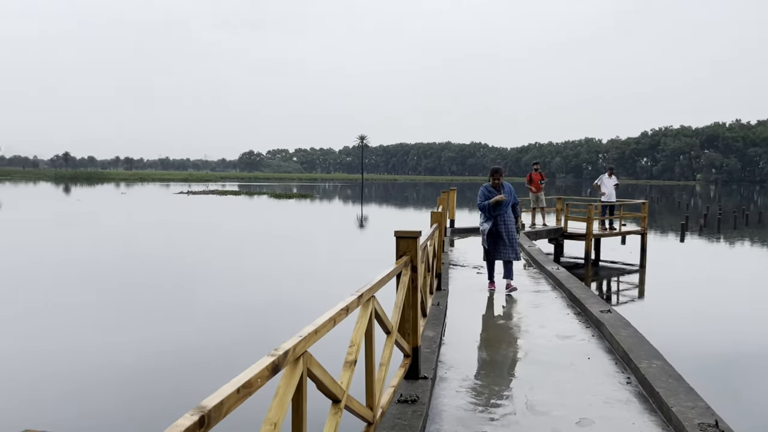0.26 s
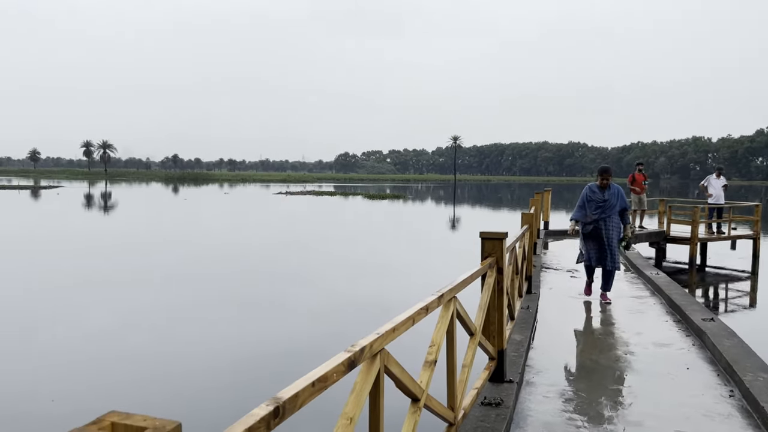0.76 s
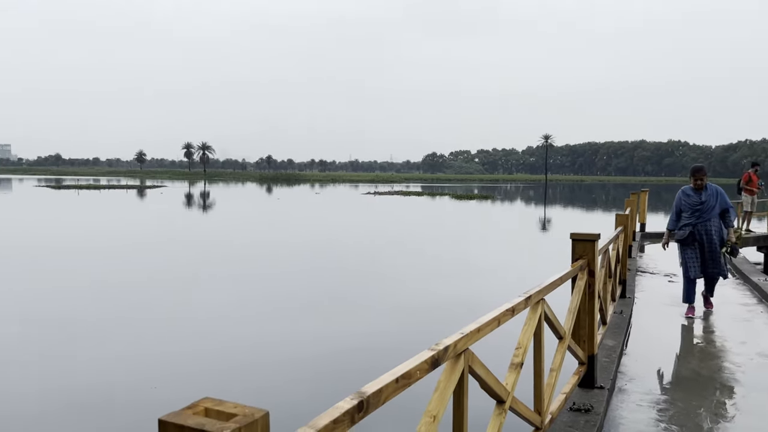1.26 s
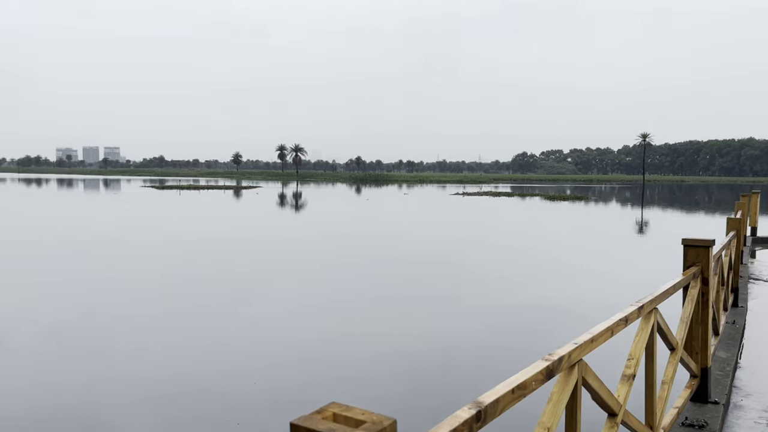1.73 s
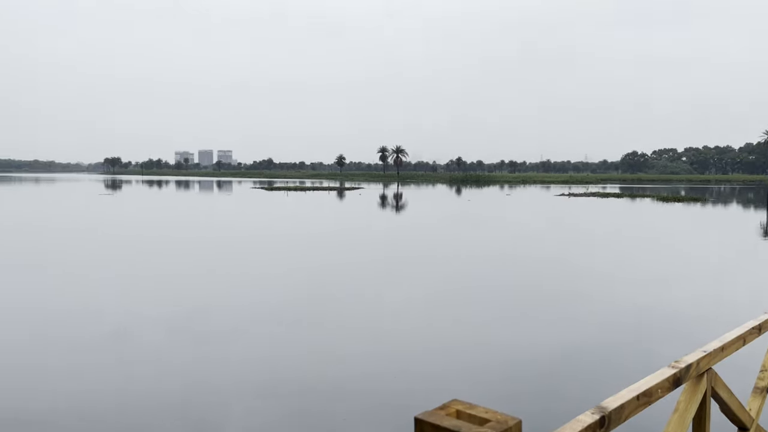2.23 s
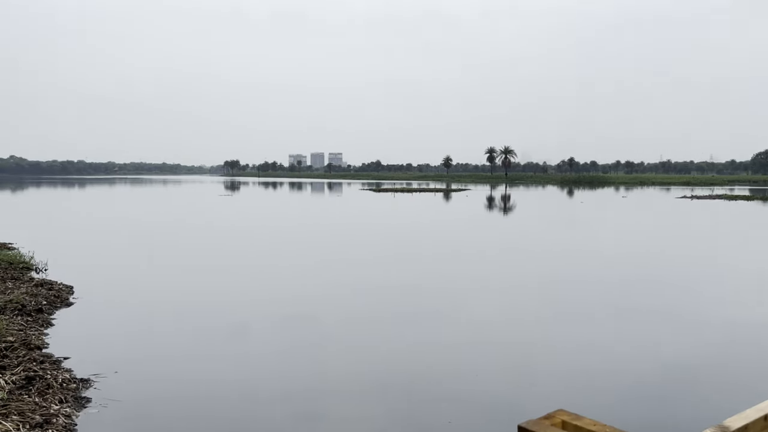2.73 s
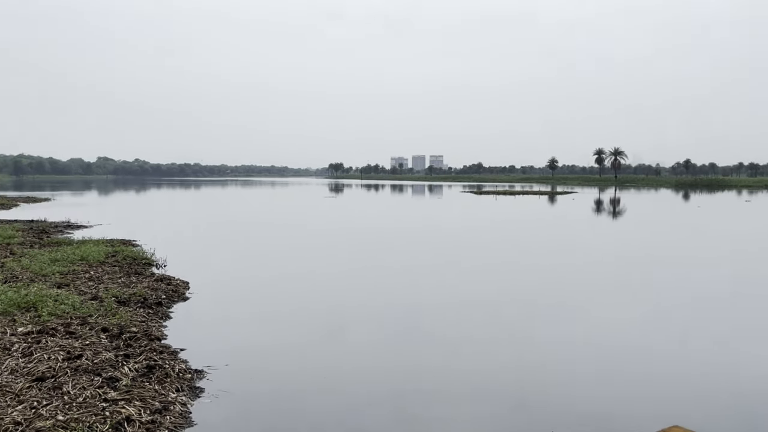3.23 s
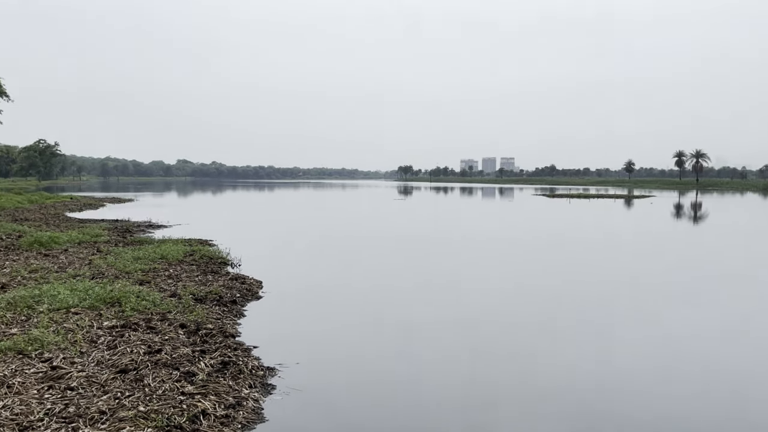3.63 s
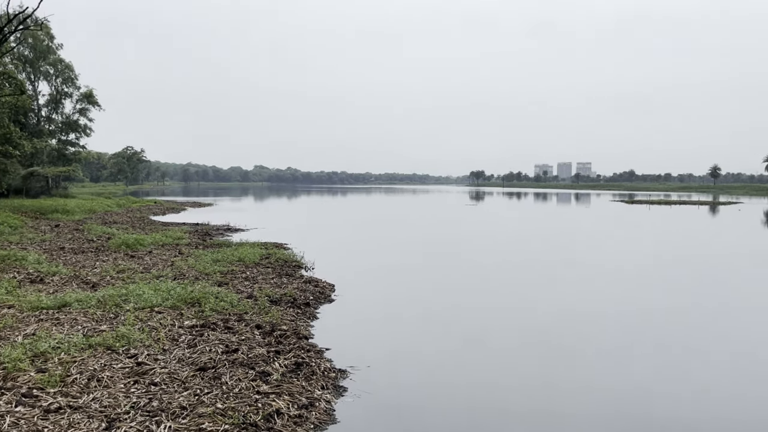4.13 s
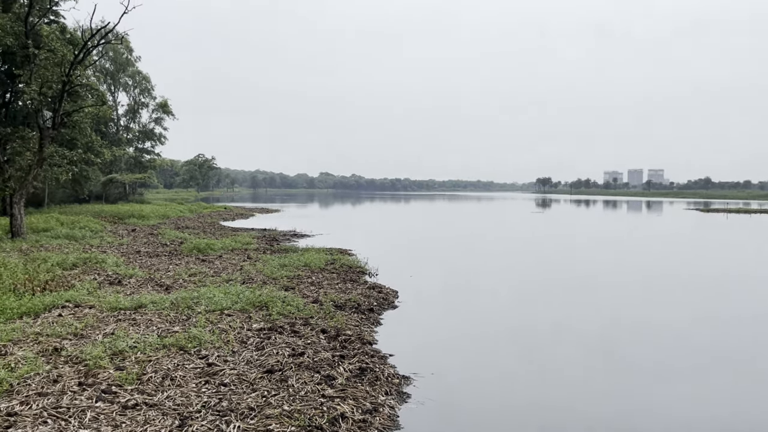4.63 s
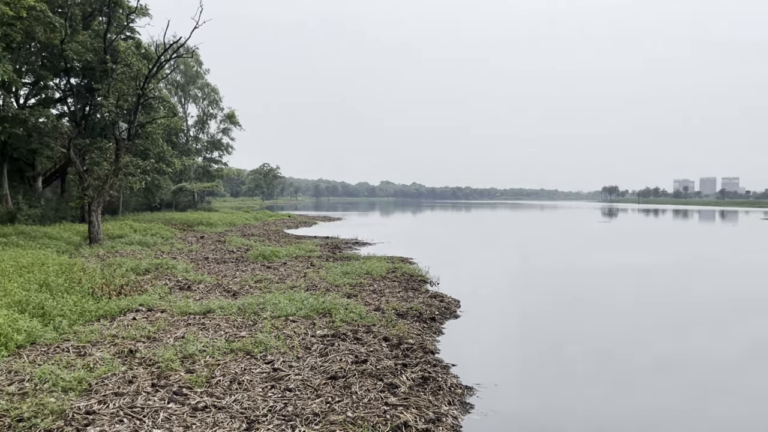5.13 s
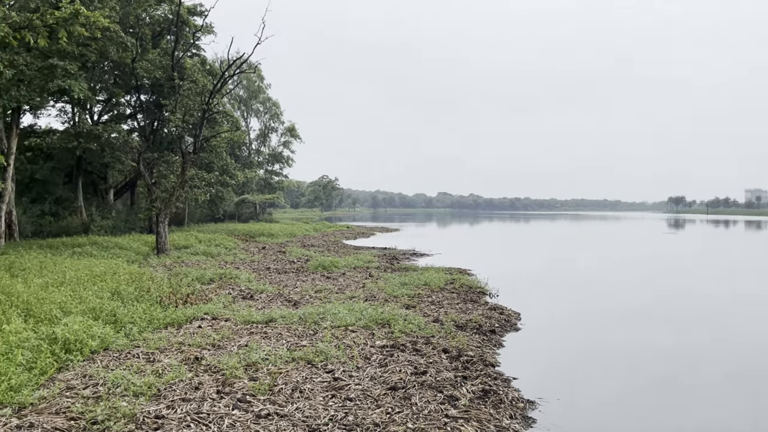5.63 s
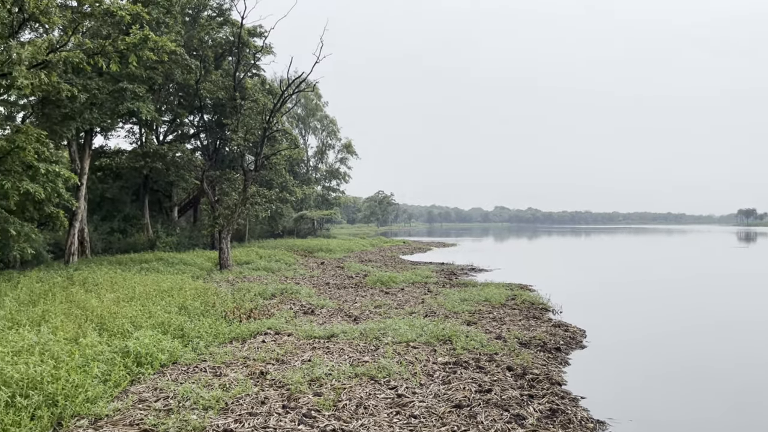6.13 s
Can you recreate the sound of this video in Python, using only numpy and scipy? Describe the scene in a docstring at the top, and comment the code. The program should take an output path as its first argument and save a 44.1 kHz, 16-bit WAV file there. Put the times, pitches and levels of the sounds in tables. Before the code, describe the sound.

Open lakeside, heard from a concrete pier. A deep distant rumble and high pulsing insect buzz run throughout. A far bird gives three rising whistles with tree echoes, a small bird twitters, grit snaps sharply near one second, and a hoarse bird squawks soon after. Soles scuff and knock close to the microphone; late on, softer sliding calls appear.

```python
"""A still lake heard from a concrete pier: from the start, a low far rumble and hum (shaped noise, faint sines)
and insects shrilling on the bank (pulsed, downward-gliding buzzes over a noise band). Grit clicks close by
(resonated impulses), a small bird twitters (gliding chips), a far bird whistles three rising slurs that echo
in the trees, soles scuff and knock (grainy noise), and a hoarse bird squawks and rasps (unsteady tones, noise).
Thin pipping follows midway; the hum grows, and late on the hoarse bird's softer calls slide up."""
import sys
import numpy as np
from scipy import signal
from scipy.fft import rfft, irfft, next_fast_len
from scipy.io import wavfile
from scipy.ndimage import uniform_filter1d, map_coordinates

SR = 44100
rng = np.random.default_rng(int(sys.argv[2]) if len(sys.argv) > 2 else 0)


def put_to_file(sound):
    """Save the sound as 16-bit audio at rate SR, in the file named by the first command-line argument."""
    columns = np.atleast_2d(sound).T  # one column per channel
    safe = np.clip(columns, -1, 1)
    whole_steps = np.round(safe * 32767)
    wavfile.write(sys.argv[1], SR, whole_steps.astype(np.int16))


N = 281358


def amp(db):
    """Decibels to gain."""
    return 10 ** (np.asarray(db) / 20)


def unit(x):
    """Scale to rms 1."""
    return x / np.sqrt(np.mean(x ** 2) + 1e-20)


def along(points, hz):
    """Interpolate (f/Hz, value) points on a log frequency axis."""
    f, v = np.transpose(points)
    return np.interp(np.log(hz + 1), np.log(f + 1), v)


def curves(rows):
    """One value per sample for each column after the time."""
    s, *cols = np.transpose(rows)
    return [np.interp(np.arange(N) / SR, s, c) for c in cols]


def wobble(rate, n=N):
    """A smooth random curve, rate knots a second."""
    knots = rng.standard_normal(int(n * rate / SR) + 4)
    return map_coordinates(knots, [np.arange(n) * rate / SR])


def filtered(x, response):
    """Apply a frequency response to x."""
    n = x.shape[-1]
    m = next_fast_len(n + 8192)
    return irfft(rfft(x, m) * response(np.fft.rfftfreq(m, 1 / SR)), m)[..., :n]


def noise(spectrum, shape=N):
    """Coloured noise of rms 1."""
    return unit(filtered(rng.standard_normal(shape), lambda hz: amp(along(spectrum, hz))))


def field(spectrum):
    """Noise from all around: alike in both channels in the bass, unrelated in the treble."""
    # left-right correlation: f/Hz, correlation
    alike = [(60, 1), (125, 0.98), (250, 0.93), (500, 0.56), (1000, 0)]

    def mid_side_gains(hz):
        angle = np.arccos(np.clip(along(alike, hz), -1, 1)) / 2
        return np.array([np.cos(angle), np.sin(angle)])

    mid, side = filtered(noise(spectrum, (2, N)), mid_side_gains)
    return unit(np.array([mid + side, mid - side]))


def spread(pair, side_db):
    """Two signals as the middle and the side of one source."""
    return unit(pair[0] + amp(side_db) * np.array([pair[1], -pair[1]]))


def patchy(x, depth_db):
    """Uneven patches of strength, some hundred Hz wide and a twentieth of a second long."""
    z = signal.stft(x, nperseg=512)[2]
    patches = uniform_filter1d(rng.standard_normal(z.shape[1:]), size=3, axis=0)
    patches = uniform_filter1d(patches, size=10, axis=1)
    return signal.istft(z * amp(depth_db * unit(patches)), nperseg=512)[1][:, :N]


def pan(left_db):
    """Gains of the two channels, left_db apart."""
    return amp([[left_db / 2], [-left_db / 2]])


def add(track, s, sound):
    """Mix a sound in at time s."""
    part = track[..., max(0, round(s * SR)):][..., :sound.shape[-1]]
    part += sound[..., :part.shape[-1]]


def note(rows, waver, waver_rate, flutter_db):
    """A bird's pure tone along (t/s, f/Hz, level/dB) rows, unsteady in pitch and strength."""
    s, hz, db = np.transpose(rows)
    t = np.arange(s[0], max(s[-1], s[0] + .01), 1 / SR)
    glide = uniform_filter1d(np.interp(t, s, hz), size=300)
    pitch = glide * (1 + waver * wobble(waver_rate, len(t)))
    level = amp(np.interp(t, s, db) + flutter_db * wobble(waver_rate, len(t)))
    tone = np.sin(2 * np.pi * np.cumsum(pitch) / SR)
    return np.sqrt(2) * level * signal.windows.tukey(len(t), .1) * tone


def woods(x, t60, wet_db, build):
    """Trunks along the shore scatter a call into a tail that builds up and dies away."""
    t = np.arange(int(1.5 * SR)) / SR
    tail = rng.standard_normal((2, len(t))) * amp(-60 * t / t60) * (1 - np.exp(-t / build))
    tail /= np.linalg.norm(tail[0])
    return amp(wet_db) * signal.fftconvolve(x[None], tail, axes=1)[:, :len(x)]


def distance():
    """Far traffic rumbles, machinery hums faintly and the foliage hisses."""
    # rumble spectrum: f/Hz, relative level/dB
    rumble_band = [(20, -39), (51, -2), (76, 0.5), (195, -13), (308, -22), (343, -21.5), (500, -41),
                   (650, -71), (1100, -120)]
    # murmur and hiss spectrum: f/Hz, relative level/dB
    air_band = [(240, -27), (400, -0.5), (520, -5), (800, -7), (1250, -16.5), (1550, -17), (2000, -26),
                (3600, -25.5), (4800, -29.5), (5500, -26.5), (6400, -37.5), (7500, -31), (12000, -80)]
    # air before the trims below: t/s, land murmur level/dB, leaf hiss level/dB
    air_levels = [(0, -59, -62), (2.4, -58, -62.5), (3.8, -59, -64), (6.38, -59, -61)]
    # far machinery before its swell: f/Hz, peak level/dB
    hum_tones = [(558, -68.5), (683, -74), (796, -70.5)]
    rumble_db, land_trim_db, leaf_trim_db = -34.5, 1.5, 2

    land_db, leaf_db = curves(air_levels)
    air = patchy(field(air_band), depth_db=2.5)
    low = filtered(air, lambda hz: 1 / (1 + (hz / 1800) ** 4))
    murmur = amp(land_db + land_trim_db) * unit(low)
    hiss = amp(leaf_db + leaf_trim_db) * unit(air - low)

    t = np.arange(N) / SR
    hum = np.zeros(N)
    for hz, db in hum_tones:
        level = amp(db + 2.9 * wobble(6.5))
        hum += level * np.sin(2 * np.pi * hz * t + 1.15 * wobble(14))
    hum_gain, = curves([(2, 0.24), (3, 1.28)])  # t/s, gain
    return amp(rumble_db) * field(rumble_band) + murmur + hiss + hum_gain * hum


def tymbal(rate, pitch_ratio, n=N):
    """One insect: each pulse slides down in pitch; leaves scatter part of the buzz into the gaps."""
    # one pulse: share of cycle, f/Hz before pitch_ratio, relative level/dB
    pulse = [(0, 10500, -15), (.13, 9640, 3), (.35, 9500, 5), (.5, 8900, 0), (.7, 7900, -10),
             (.85, 7600, -45)]
    # radiation of the body: f/Hz, relative level/dB
    body_band = [(7000, -30), (8300, 0), (9750, 0), (10900, -27)]
    cycle = np.cumsum(rate + .4 * wobble(20, n)) / SR % 1
    share, hz, db = np.transpose(pulse)
    pitch = pitch_ratio * np.interp(cycle, share, hz) + 30 * wobble(900, n) + 20 * wobble(3, n)
    strength_db = np.interp(cycle, share, db) + 0.75 * wobble(60, n) + 1.16 * wobble(700, n)
    strength = uniform_filter1d(amp(strength_db), size=30)
    tone = strength * np.sin(2 * np.pi * np.cumsum(pitch) / SR)
    buzz = unit(filtered(tone, lambda f: amp(along(body_band, f))))
    scatter = woods(buzz, t60=.1, wet_db=-5, build=.002)
    return unit(buzz + (scatter + scatter.mean(axis=0)) / 2)


def bout(t, start, stop, swell, db, swell_db, release):
    """Gain of a bout of song that swells, holds and dies by 20 dB per release time."""
    outside = np.maximum(start - t, 0) + np.maximum(t - stop, 0)
    below_db = swell_db * np.clip(1 - (t - start) / swell, 0, 1)
    return amp(db - below_db - 20 * outside / release)


def insects():
    """Bouts of nearer and farther insects, at various pitches and pulse rates, over a buzz and a noise band."""
    # t start/s, t stop/s, swell/s, level/dB, release/s per 20 dB, pitch ratio, pulse rate/Hz
    bouts = [(0, .932, .8, -51.5, 0.071, 0.95, 58), (0.198, 1.616, 1.5, -47.5, 1, 0.994, 58.5),
             (0.902, 1.6, 0.21, -53, 0.29, 1.03, 57), (1.603, 2.902, .22, -55, 0.46, .94, 57.5),
             (1.86, 2.17, .15, -46.5, .05, 1.002, 60.5), (2.879, 4.4, .33, -43.5, .14, 1.003, 60.4),
             (4.351, 4.75, 0.33, -52.5, 0.23, 1.028, 59), (4.8, 6.043, 0.54, -44.5, .056, 0.99, 62),
             (5.8, 6.38, 0.43, -47, .096, 1.03, 57)]
    # chorus noise spectrum: f/Hz, relative level/dB
    chorus_band = [(6800, -61), (7500, -48), (8000, -18.5), (8950, -3.5), (9300, 2.5), (9700, -3.5),
                   (10000, -11.5), (10400, -22), (11000, -33), (11800, -109)]
    # chorus strength: t/s, level/dB
    chorus_levels = [(0, -56.5), (1.3, -58), (3.5, -49.5), (4.45, -52), (6.35, -46)]
    second_rate_hz = 57.5  # pulses
    chorus_db, = curves(chorus_levels)
    singers = np.zeros((2, N))
    for start, stop, swell, db, release, pitch_ratio, rate in bouts:
        t = np.arange(max(start - .1, 0), stop + 2 * release, 1 / SR)
        effort = bout(t, start, stop, swell, db, swell_db=9, release=release)
        add(singers, t[0], effort * tymbal(rate, pitch_ratio, n=len(t)))
    second = amp(chorus_db + wobble(3.4)) * tymbal(second_rate_hz, pitch_ratio=0.94)
    crowd = patchy(spread(noise(chorus_band, (2, N)), side_db=-27), depth_db=1.5)
    return singers + second + amp(chorus_db) * crowd


def clicks():
    """Grit snaps: a sharp push and a brief crumble through broad resonances."""
    # t/s, peak level/dB before pan, lift of the highest treble/dB before peak scaling
    snaps = [(.224, -41.5, -6), (1.0524, -28.5, -1), (1.065, -28, -3), (1.0784, -15, -3), (1.0821, -18, -5),
             (1.129, -37.5, 3), (5.2557, -34, -8), (5.2687, -34.5, -8), (5.2753, -28, -5), (5.967, -30, 23)]
    # resonances: f/Hz, width/Hz, relative level/dB
    grit = [(3310, 1200, 1.5), (4130, 680, 8), (5520, 850, 2.5), (14500, 3700, -19)]

    def resonances(f):
        total = 0
        for k, (centre, width, db) in enumerate(grit):
            damping = 1j * f * width
            total = total + (-1) ** k * amp(db) * damping / (centre * centre - f * f + damping)
        return total

    out = np.zeros((2, N))
    t = np.arange(SR // 25) / SR
    for s, db, lift_db in snaps:
        crumble = .07 * rng.standard_normal((2, len(t))) * amp(-60 * t / .018)
        snap = filtered((t == 0) + crumble, resonances)
        snap = filtered(snap, lambda hz: amp(along([(9000, 0), (13000, lift_db)], hz)))
        add(out, s, amp(db) * snap / np.abs(snap).max())
    return out * pan(left_db=3.5)


def chip(s, length, first_hz, last_hz, db):
    """A short note, strongest midway, whose glide levels off at the end."""
    u = np.linspace(0, 1, num=9)
    hz = last_hz + (first_hz - last_hz) * (1 - u) ** 1.67
    path = np.column_stack([s + length * u, hz, db - 9 * (2 * u - 1) ** 2])
    return note(path, waver=.015, waver_rate=376, flutter_db=3.5)


def small_birds():
    """One bird repeats a phrase of chips, never quite alike; farther off, a run of pips and lone notes."""
    # phrases: t/s, level/dB, lift of the chips after the first two/dB
    twitters = [(.285, -60, -6), (.55, -57, -8), (.83, -59, -6), (2.825, -60, 0.5), (3.095, -57.5, 0),
                (3.37, -59.5, -3.5), (3.645, -60, 0)]
    # chips: t after phrase start/s, length/s, first f/Hz, last f/Hz, level re phrase/dB
    phrase = [(-.01, .022, 5400, 4950, -10), (.008, .036, 4400, 3700, -7), (.047, .02, 6800, 6150, -10),
              (.06, .018, 4550, 4850, -6.5), (.082, .02, 6000, 5600, -9), (.095, .03, 5200, 4660, -0.5)]
    # pip run: t start/s, t stop/s, swell/s, level/dB before far_trim_db
    pipping = (3, 3.5, .35, -61.5)
    # far birds: t/s, length/s, first f/Hz, last f/Hz, level/dB before far_trim_db
    lone_notes = [(2.389, 0.066, 1135, 1123, -60), (2.835, .09, 4850, 4530, -67)]
    chip_scatter_db, far_trim_db = 1.5, -1.5
    pip_swell_db, pip_every_s, pip_s, pip_hz = 3, .06, 0.022, 3100

    song, far = np.zeros((2, N))
    for start, loud_db, later_db in twitters:
        for k, (delay, length, first_hz, last_hz, chip_db) in enumerate(phrase):
            s = start + delay
            db = loud_db + chip_db + later_db * (k >= 2) + rng.normal(0, chip_scatter_db)
            add(song, s, chip(s, length, first_hz, last_hz, db))

    start, stop, swell, pip_db = pipping
    for s in np.arange(start, stop, pip_every_s):
        db = pip_db - pip_swell_db * max(1 - (s - start) / swell, 0)
        first_hz, last_hz = pip_hz + rng.normal(0, 170, 2)
        onset = s + rng.normal(0, .007)
        add(far, onset, chip(onset, pip_s, first_hz, last_hz, db))
    for row in lone_notes:
        add(far, row[0], chip(*row))

    near_mix = song * pan(left_db=7.0) + woods(song, t60=0.6, wet_db=-6.5, build=.01)
    far_mix = amp(far_trim_db) * far + woods(far, t60=.6, wet_db=0.5, build=0.011)
    return near_mix + far_mix


def slur(start, climb, low_hz, crest_hz, db, swell_db, pause, fall_db):
    """(t/s, f/Hz, level/dB) path: a dip, a steepening, swelling climb, a thin crest, a straight fall."""
    dip_share, bend = 0.283, 1.7  # where in the climb pitch is lowest; curvature
    loudest_share, swell_bend = 0.93, 1.57  # where in the climb it is loudest; how late it swells
    break_hz, end_hz = 1570, 1226
    break_s, break_drop_db, crest_s = 0.0081, 14, 0.0318
    fall_s, fall_attack_s, fall_fade_db = .11, 0.02, 17

    u = np.linspace(0, 1, num=30)
    hz = low_hz + (break_hz - low_hz) * np.abs((u - dip_share) / (1 - dip_share)) ** bend
    effort = np.minimum(u / loudest_share, 1) ** swell_bend
    rise = np.column_stack([start + climb * u, hz, db - swell_db * (1 - effort)])

    # the tone thins out quickly and goes on up to its crest
    top = start + climb
    since_break = np.array([break_s, crest_s, crest_s + pause])
    thin_hz = np.interp(since_break, [0, crest_s], [break_hz, crest_hz])
    crest = np.column_stack([top + since_break, thin_hz, np.full(3, db - break_drop_db)])

    turn = top + crest_s + pause
    since_turn = fall_attack_s + (fall_s - fall_attack_s) * u
    low_glide = np.interp(since_turn, [0, fall_s], [crest_hz, end_hz])
    fall = np.column_stack([turn + since_turn, low_glide, fall_db - fall_fade_db * u ** 2])
    return np.vstack([rise, crest, fall])


def whistler():
    """Each slur swells as it climbs, breaks near the top and falls away; the tree line answers."""
    # t start/s, climb/s, lowest f/Hz, crest f/Hz, level/dB, swell/dB, crest pause/s, fall level/dB
    whistles = [(.42, .295, 1297, 1640, -43.5, 20.5, .002, -51),
                (1.8, 0.24, 1332, 1678, -46.5, 13, .04, -47),
                (3.165, .25, 1353, 1706, -42.5, 16, .04, -45.5)]
    # lag of the left channel, shifting the bearing: t/s, lag/ms
    bearing = [(.7, .17), (2, 0.23), (3.3, 0.068)]
    echo_s, echo_db = .072, -12.5
    song = np.zeros(N)
    for row in whistles:
        add(song, row[0], note(slur(*row), waver=0.0035, waver_rate=70.4, flutter_db=1.5))
    t = np.arange(N) / SR
    lag_ms, = curves(bearing)
    left = np.interp(t - lag_ms / 1000, t, song)
    echo = amp(echo_db) * np.interp(t - echo_s, t, song)
    direct = np.array([left, song]) * pan(left_db=-4.0)
    return direct + echo + woods(song, t60=0.84, wet_db=-3.0, build=0.022)


def scuffs():
    """Soles on concrete: grainy scuffs, some swelling, and three quick knocks that start abruptly and die away."""
    # t peak/s, rise/s per 20 dB, fall/s per 20 dB, level/dB before pan, relative treble/dB
    contacts = [(1.078, 0.079, 0.1, -46.5, -0.5), (1.275, .015, 0.038, -50.5, 0),
                (1.326, 0.066, 0.026, -44.5, -6), (2.1185, .001, 0.021, -38.5, -1.5),
                (2.129, .001, 0.013, -36, -10), (2.141, .001, 0.018, -41.5, -6.5),
                (4.619, 0.036, 0.038, -54, 2), (5.651, .012, 0.031, -41, -17),
                (5.687, 0.052, 0.037, -38, -20), (5.748, .06, 0.037, -47.5, -19),
                (5.997, 0.049, 0.029, -40, -8)]
    # sole spectrum: f/Hz, relative level/dB
    sole = [(150, -16), (450, -6), (1200, -4.5), (1700, -9), (2800, -4), (5000, -11), (8000, -15.5),
            (12000, -41)]
    out = np.zeros((2, N))
    t = np.arange(-SR // 6, SR // 6) / SR
    for s, rise, fall, db, treble_db in contacts:
        grains = spread(rng.standard_normal((2, len(t))), side_db=-8.0)
        grains = grains * amp(1.73 * wobble(496.7, len(t)))
        treble = [(1700, 0), (2100, treble_db)]
        rub = unit(filtered(grains, lambda hz: amp(along(sole, hz) + along(treble, hz))))
        add(out, s + t[0], rub * amp(db - 20 * np.maximum(-t / rise, t / fall)))
    return out * pan(left_db=2.0)


def hoarse_bird():
    """A quavering squawk breaks into a noisy rasp; later calls slide up and hold, deeper in the trees."""
    # t start/s, length/s, first f/Hz, last f/Hz, attack/s, level/dB before pan
    squawks = [(1.506, 0.075, 3834, 3750, .052, -50), (1.577, 0.061, 3770, 3750, .01, -50.5),
               (1.625, .06, 3400, 2800, .015, -63), (1.633, 0.188, 3830, 3990, .06, -56.5)]
    # harsh bursts: t peak/s, level/dB before flutter and pan
    rasps = [(1.5, -60.5), (1.64, -52.5), (3.85, -62.5)]
    # rasp spectrum: f/Hz, relative level/dB
    rasp_band = [(600, -20), (2300, -22), (2850, -20), (3300, -12), (4100, -10.5), (5200, -23), (7000, -57)]
    # soft rising calls: t/s, level/dB before far_trim_db
    upslurs = [(4.39, -63), (4.96, -62), (5.43, -59.5), (5.941, -57)]
    onset_db, fade_db, far_trim_db = 9, 9, -2  # a squawk starts and ends this far below its peak
    rasp_attack_s_per_20db, rasp_decay_db_per_s = 0.074, 55

    near, far = np.zeros((2, N))
    for s, length, first_hz, last_hz, attack, db in squawks:
        path = [(s, first_hz, db - onset_db),
                (s + attack, (first_hz + last_hz) / 2, db),
                (s + length, last_hz, db - fade_db)]
        add(near, s, note(path, waver=0.0174, waver_rate=400, flutter_db=3.0))

    t = np.arange(N) / SR
    rasp = np.zeros(N)
    for s, db in rasps:
        below_db = np.maximum(20 * (s - t) / rasp_attack_s_per_20db, rasp_decay_db_per_s * (t - s))
        rasp += amp(db - below_db)
    near += rasp * amp(0.91 * wobble(90)) * noise(rasp_band)

    for s, db in upslurs:
        slide = [(s - .07, 3150, db - 8), (s, 3700, db), (s + 0.107, 3780, db - 13)]
        add(far, slide[0][0], note(slide, waver=0.03, waver_rate=430, flutter_db=3.5))

    near_mix = near * pan(left_db=11.5) + woods(near, t60=0.53, wet_db=-3.0, build=.015)
    far_mix = amp(far_trim_db) * far + woods(far, t60=0.67, wet_db=-2, build=.015)
    return near_mix + far_mix


def scene():
    """Birds and insects across the water, small noises on the pier."""
    return distance() + insects() + clicks() + small_birds() + whistler() + scuffs() + hoarse_bird()


def record(dry):
    """Cut everything from the band limit up."""
    top_hz = 15750
    return filtered(dry, lambda hz: hz < top_hz)


dry = scene()
out = record(dry)
put_to_file(out)
```